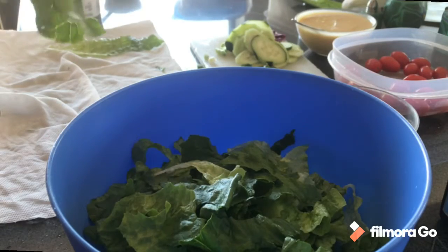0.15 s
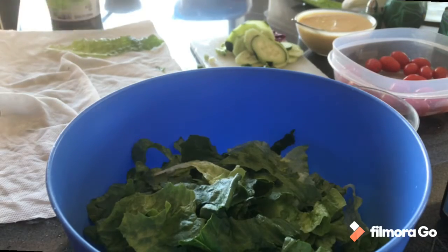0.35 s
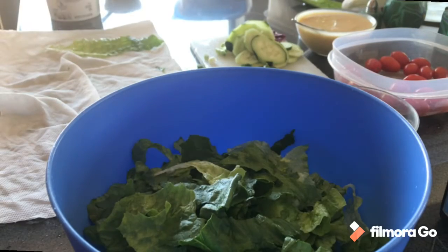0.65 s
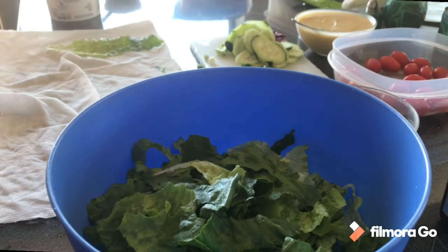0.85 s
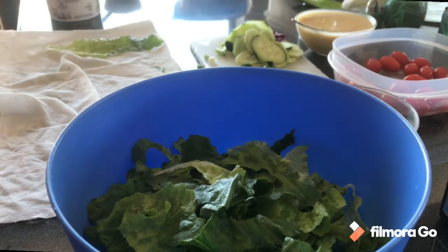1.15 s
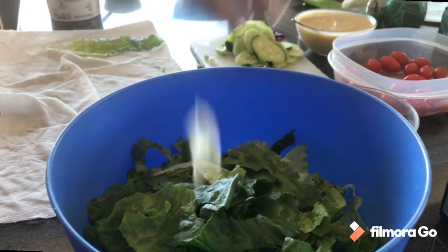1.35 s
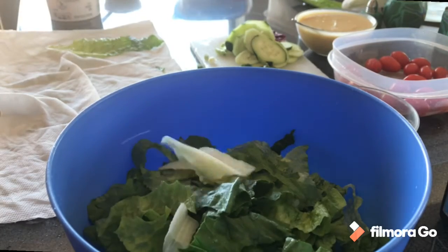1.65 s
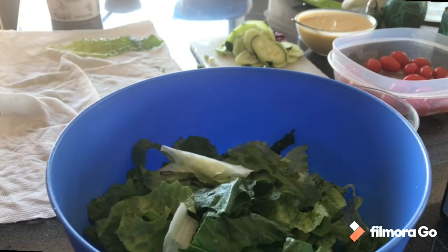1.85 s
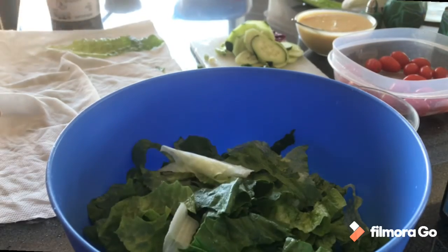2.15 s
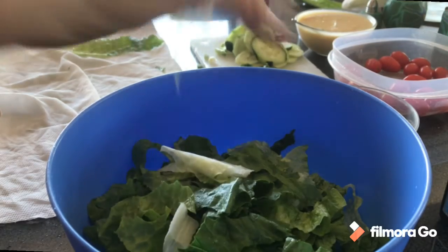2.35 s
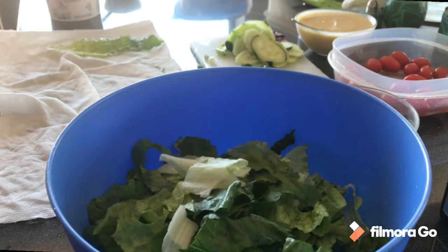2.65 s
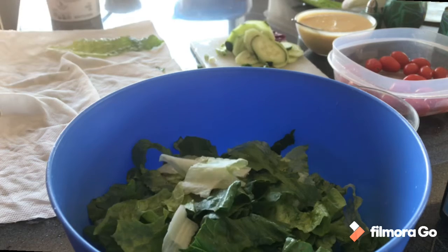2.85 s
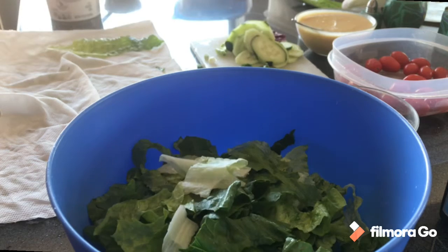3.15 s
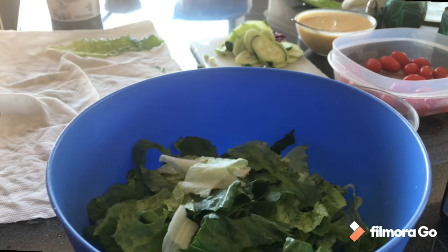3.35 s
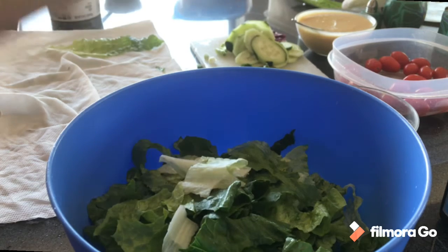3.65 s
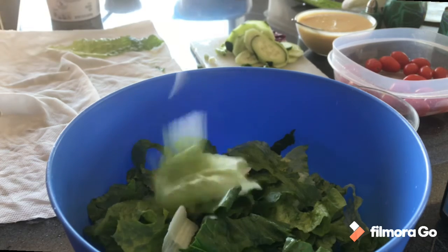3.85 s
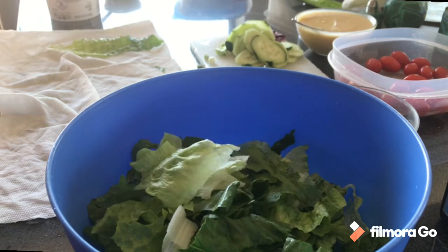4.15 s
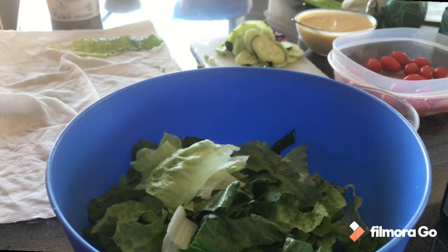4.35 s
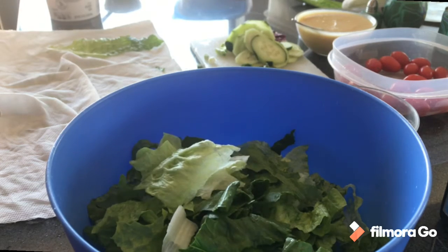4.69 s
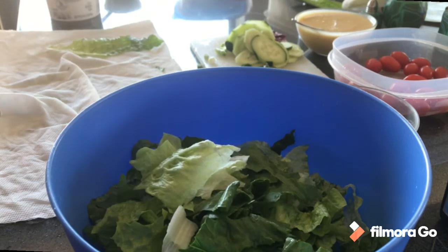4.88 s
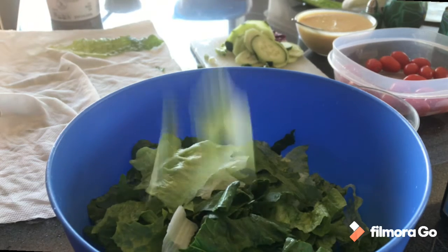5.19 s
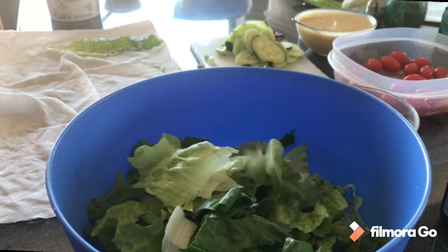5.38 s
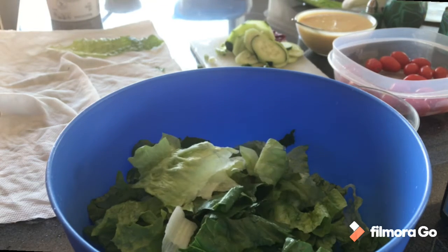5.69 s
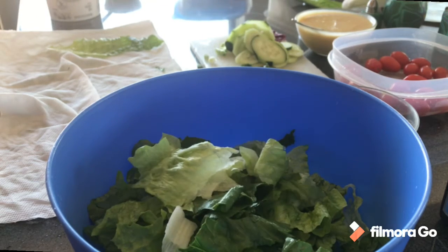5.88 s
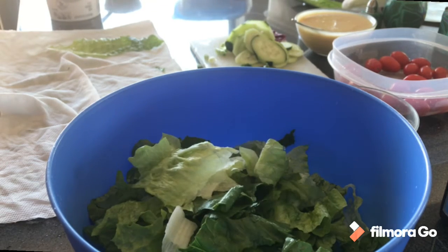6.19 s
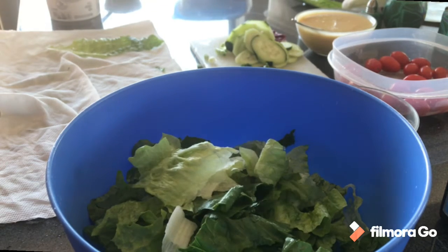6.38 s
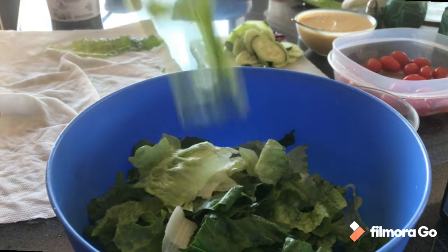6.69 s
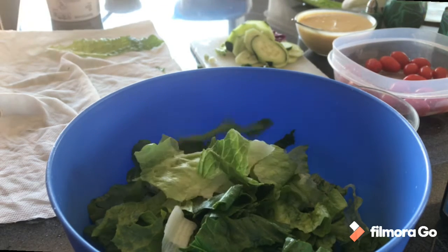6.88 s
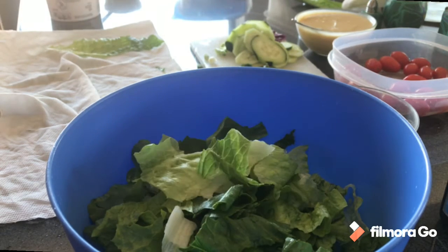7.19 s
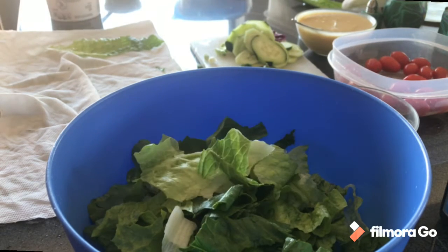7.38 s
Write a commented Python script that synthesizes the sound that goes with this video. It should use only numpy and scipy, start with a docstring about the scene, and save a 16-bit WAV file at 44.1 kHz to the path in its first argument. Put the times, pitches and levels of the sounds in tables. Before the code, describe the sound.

Short crackling rips of fresh lettuce leaves, ribs popping in uneven bursts, torn pieces landing softly on a heap of greens.

```python
"""Tearing crisp lettuce

Crisp lettuce is torn by hand over a plastic salad bowl in a quiet kitchen.
Ribs and veins snap as short runs of noise impulses, each ringing a flap of leaf.
Between the snaps the bent leaf crinkles: random tiny ticks that swell with every bend.
Torn pieces drop on the heap as soft noise bursts, the room answers with early echoes
and a short noise tail, and filtered noise and wavering sines make the air and appliance hum."""
import sys
import numpy as np
from scipy import signal
from scipy.fft import rfft, irfft
from scipy.io import wavfile
from scipy.ndimage import uniform_filter1d

SR = 44100
rng = np.random.default_rng(int(sys.argv[2]) if len(sys.argv) > 2 else 0)


def unload_audio(sound):
    """Save the sound as a 16-bit wav file, at the path given as the first command line argument."""
    columns = np.transpose(np.atleast_2d(sound))
    # keep every value between -1 and 1, then stretch to whole-number steps
    steps = np.round(np.clip(columns, -1, 1) * 32767)
    wavfile.write(sys.argv[1], SR, steps.astype(np.int16))


N = 332073  # length in samples

# spectrum of the room's air, shape only: f/Hz, level/dB
AIR_SPECTRUM = [(20, -35.5), (42, -11.5), (65, 2.5), (100, -6), (250, -3), (400, -11), (700, -19),
                (1100, -18.5), (2000, -27), (6000, -29), (10500, -37.5), (15500, -30)]
# appliance hum lines: f/Hz, rms level/dB
HUM_LINES = [(67.5, -69.5), (131.5, -66), (263.8, -70), (474, -74.5), (1007, -80.5)]
# the kitchen's decay time to -60 dB: f/Hz, t60/s
KITCHEN_DECAY = [(200, 0.44), (1000, 0.48), (3000, 0.5), (6000, 0.39), (10000, 0.35), (16000, 0.28)]
# one reflection off the counter: delay/s, gain
COUNTER_ECHO = (0.001213, 0.057)
# single reflections off the counter and the cupboards: delay/s, gain
CUPBOARD_ECHOES = [(.0062, 0.23), (.0095, 0.14), (0.0111, 0.079), (0.0136, 0.069)]
# pieces landing on the heap: t/s, energy level/dB, settling time/s, piece resonance f/Hz, its height/dB
LANDINGS = [(1.462, -25.5, 0.0036, 3000, -1), (1.498, -30.5, 0.0034, 3500, 6),
            (1.617, -21.5, 0.0044, 2000, -5), (2.5061, -10.5, 0.0041, 4960, 8),
            (3.938, -18, 0.016, 3000, 0), (3.998, -25.5, 0.0027, 5100, -5), (5.295, -21, 0.01, 3980, 2),
            (6.803, -15.5, 0.005, 5150, 3.5), (6.835, -19, 0.0087, 1974, -1)]
# spectrum of a landing, shape only: f/Hz, level/dB
HEAP_SPECTRUM = [(80, -9), (300, -7.5), (700, -3), (1400, -3), (2500, -4), (5200, -2.5), (9000, -6.5),
                 (15500, -15.5)]
# each bend of a leaf, in the fingers or as it settles in the bowl:
# start t/s, length/s, level/dB (before the crinkle's trim)
LEAF_BENDS = [(0.054, 0.063, -48), (0.129, 0.12, -59.5), (0.453, 0.086, -65), (0.746, 0.022, -60),
              (0.931, 0.18, -56), (1.469, 0.017, -60), (1.629, 0.035, -57.5), (1.739, 0.052, -61.5),
              (1.836, 0.12, -55.5), (2.023, .12, -52), (2.176, 0.048, -44.5), (2.385, 0.023, -56),
              (2.721, 0.033, -54), (2.771, 0.095, -64), (3.176, 0.14, -55), (3.376, 0.068, -51),
              (3.496, 0.044, -37), (3.575, 0.18, -60), (3.815, 0.048, -62.5), (4.234, 0.04, -49.5),
              (4.33, 0.16, -52.5), (4.529, 0.054, -61), (4.678, 0.086, -48), (4.824, .14, -46),
              (5.091, 0.039, -55.5), (5.34, 0.044, -66), (5.678, 0.16, -51), (5.92, .11, -52),
              (6.106, .145, -55.5), (6.281, 0.18, -45), (6.492, 0.073, -54), (6.621, 0.072, -53),
              (6.811, .035, -58), (6.946, .07, -62.5), (7.037, 0.042, -55), (7.173, 0.092, -56.5),
              (7.312, 0.062, -56), (7.443, 0.089, -46.5)]
# spectrum of the crinkle, shape only: f/Hz, level/dB
CRINKLE_SPECTRUM = [(200, -25), (700, 1), (1300, 3.5), (3000, 1.5), (6000, 2.5), (10000, -4), (15500, -4)]
# ribs and veins that stand out of the crinkle, tear by tear; thin veins pop as the leaf is folded:
# t/s, energy level/dB, crack length/ms, leaf resonance f/Hz, its height/dB, body/dB, crispness/dB
RIB_SNAPS = [ (0.0391, 1.5, 2.8, 8100, 2.5, 11, 3.5), (0.109, -15, 0.2, 9000, 1, -4, 6),
             (0.261, -12, 0.28, 2590, 2, 10, -2.5), (0.3682, -12, 0.15, 1710, 14.5, 18.5, 4),
             (0.5893, -33.5, 0.084, 6000, 0, 2, 12), (0.6406, -12.5, 0.077, 2090, 8, 8.5, 6.5),
             (0.7731, -26, 1, 2800, 10, 6, -3), (0.8184, -8.5, 0.2, 2000, 19, -3.5, 8.5),
             (0.8399, 0, 0.31, 3670, 9, 0.5, 5.5), (0.9188, -10, 0.4, 3640, 10, -2, 1),
             (0.9348, -5, 0.43, 2240, 4.5, -15, -0.5), (0.968, 3.5, 0.35, 3230, 13, 0.5, 1.5),
             (0.9737, -8.5, 0.9, 3090, -14, -7, 1), (1.1402, -15, 0.66, 2500, 2, -16, -2),
             (1.9116, -14, 2.8, 4530, 11, 3, 2), (1.977, -12, 1.7, 5140, 16, 17, 10),
             (2.0037, -11, 1.3, 1180, 13.5, 4, -2), (2.0274, -8, 0.68, 7150, 7, 9, 0),
             (2.043, -9.5, 0.25, 6080, 7, 11, -1), (2.1002, -4, 0.1, 1260, 11, -14, 3.5),
             (2.161, -15, 0.35, 3090, 5, -5, 0), (2.167, 5, 1.3, 1310, 4, 5.5, -3),
             (2.178, -13, 1.1, 1690, 8, 16, 5), (2.1956, -3, 2.4, 4570, 3, -4, 0),
             (2.2455, -5.5, 0.92, 2500, 13, -1, 6), (2.381, -28, 0.2, 3670, 18, 3, 15),
             (2.785, -24.5, 0.23, 4740, 17, 26, 24), (2.824, -25, 0.2, 4740, 8, 1.5, 11),
             (3.068, -26, 7, 8000, -2, 1, 9), (3.172, -21, 0.18, 6700, 7, -1, 6),
             (3.199, -11.5, 0.1, 2320, 6, 6, 7), (3.2745, -19.5, 0.15, 4200, 14, 3, -1),
             (3.4116, -6, 0.35, 1990, 10, -4, 1), (3.4359, -7.5, 4.3, 5000, 5, 15, 4),
             (3.4618, 4, 1.3, 4630, 11, 4, 6.5), (3.466, -3.5, 0.58, 1740, 5, 18, -11),
             (3.4824, -6.5, 0.22, 1130, 24, -18, -13), (3.5113, -3, 1.1, 4150, 11, 14, 10),
             (3.5221, -5.5, 2, 4190, 7, 16.5, 5), (3.53, -7.5, 0.91, 1250, 20, -9, -2),
             (3.604, -15, 0.25, 9000, 5, 14, 9), (3.6162, -16, 0.98, 1290, 17, -9, -4),
             (4.1668, -31, 1.7, 4000, 8, 6, -5), (4.2084, -23, 0.37, 3690, 15, 19, 17),
             (4.254, -13, 2.5, 5500, 9, 2, 4), (4.2718, -18.5, 1.2, 2980, 7, 21, 5),
             (4.3135, -8, 0.44, 1040, 8, -3.5, 0), (4.3669, -12, 0.33, 5510, 10, 3, 11),
             (4.42, -20, 1.9, 3320, 5, 14, 6), (4.45, -16, 5, 3600, 7, 17, 13),
             (4.7115, -9.5, 0.72, 7530, 5.5, 11.5, -2), (4.811, -13, 4.5, 3440, 2, -1, 3),
             (4.8172, -4.5, 1, 2520, 3, 4, -3), (4.822, -2.5, 1.1, 2410, 4, 7, 2),
             (4.8267, -7, 0.79, 1310, -1, 16.5, -2), (4.8402, -5, 0.43, 1460, 15, -10, -8),
             (4.8659, -3.5, 2.3, 2830, 11.5, 0, 3.5), (4.9153, -14, 0.63, 2700, 25, 0, 11),
             (4.9284, -11.5, 1.8, 2880, -4, -11, 6), (4.9454, -8, 0.9, 2880, 3.5, 4, 4.5),
             (4.9533, -15, 0.2, 3780, 20, 9, 9), (5.1248, -20, 2.7, 7200, 3, -4, 12),
             (5.5448, -26, 0.14, 5500, 7, 9, 2), (5.5931, -15, 0.23, 8200, 11.5, 14.5, -2.5),
             (5.704, -11.5, 0.14, 8090, 11.5, -1, 0.5), (5.7769, -9.5, 0.22, 6200, 9, 0, 11),
             (6.0114, -18.5, 1.7, 4260, 5, 17, 9), (6.247, -22.5, 0.23, 6770, 2, 2, -2),
             (6.2666, -1, 0.2, 1710, 6.5, -3.5, 0.5), (6.3202, -6, 0.2, 1350, 19, -4, 0),
             (6.358, -9, 2.3, 1530, 15, 6, 0), (6.3749, -2.5, 0.81, 5950, 8.5, 17, 8),
             (6.392, -8.5, 1.8, 2980, 3, -8, 7), (6.434, -9.5, 0.18, 8090, 10, 12, 11),
             (6.4896, -14.5, 0.23, 1600, 12, -1, 8.5), (6.5287, -12.5, 0.18, 5300, 10, 16, 19),
             (6.61, -26.5, 0.17, 2240, -2, -11, 6), (6.625, -23.5, 2.6, 4940, 6, 1, 15),
             (7.1984, -15.5, 0.17, 1290, 22, -21, -15), (7.2107, -14.5, 0.56, 2800, 10, 8, 10.5),
             (7.472, -15.5, 9.5, 5660, 10, 14, 7), (7.5048, -4, 0.16, 2880, 2.5, -3, -0.5),
             (7.5245, -8.5, 2.1, 4060, 3, 5.5, 3)]
# spectrum of a snap, shape only: f/Hz, level/dB
LEAF_SPECTRUM = [(100, -24), (250, -24), (370, -16), (520, -28.5), (800, -23.5), (1150, -8), (1480, -9),
                 (1900, -6.5), (3000, -1), (5200, 0), (7200, -3), (10500, -9.5), (15500, -13)]

HOLD_DB = -72.5  # a leaf that is only held, on the same scale as the bends
BEND_ATTACK_S, BEND_RELEASE_S = 0.024, 0.019
VEINS_DB, VEIN_SCATTER_DB = -5, 2.5  # small veins' rms level re the bend's, and scatter between veins
LEAD = 128  # samples of lead-in before the main break
GRAIN = 1024  # samples in a crack or an impulse response


def amp(db):
    """Turns dB into an amplitude factor."""
    return 10 ** (np.asarray(db) / 20)


def evened(x):
    """Scales to rms 1."""
    return x / np.sqrt(np.mean(x ** 2) + 1e-20)


def unit(x):
    """Scales to energy 1."""
    return x / np.sqrt(np.sum(x ** 2) + 1e-20)


def read(points, hz):
    """Reads a curve on a log-frequency axis."""
    f, value = np.transpose(points)
    return np.interp(np.log(hz + 1), np.log(f + 1), value)


def add(mix, s, sound):
    """Mixes a sound in at time s."""
    part = mix[max(round(s * SR), 0):][:len(sound)]
    part += sound[:len(part)]


def bins(size):
    """Frequencies in Hz of a real spectrum."""
    return np.fft.rfftfreq(size, 1 / SR)


def ring(db):
    """Builds the minimum-phase impulse response with this dB spectrum: energy comes as early as it can."""
    log_gain = np.log(amp(np.r_[db, db[-2:0:-1]]))
    return np.fft.ifft(np.exp(np.conj(signal.hilbert(log_gain)))).real


def drift(hz):
    """Makes slow random motion of rms 1, up to about hz."""
    spectrum = rfft(rng.standard_normal(N)) / (1 + (bins(N) / hz) ** 4)
    return evened(irfft(spectrum, N))


def background(air_db=-58.5, waver=0.28, waver_hz=31, wander_hz=1.467, wander_rate_hz=4.2):
    """Rumble and hiss of the room, with appliance lines that waver in level and wander in pitch."""
    air_spectrum = rfft(rng.standard_normal(N)) * amp(read(AIR_SPECTRUM, bins(N)))
    out = amp(air_db) * evened(irfft(air_spectrum, N))
    for hz, db in HUM_LINES:
        turns = np.cumsum(hz + wander_hz * drift(wander_rate_hz)) / SR
        line = (1 + waver * drift(waver_hz)) * np.sin(2 * np.pi * turns)
        out += amp(db) * evened(line)
    return out


def kitchen(x, wet_db=-10.5, first_s=0.0017, build_s=0.0035, count=4):
    """A dense noise tail whose treble dies first; random tails trade places at fixed rates to keep it smooth."""
    t, out = np.arange(SR * 3 // 4) / SR, np.zeros(N)
    for k in range(count):
        hz, at, z = signal.stft(rng.standard_normal(len(t)), SR, nperseg=256)
        decay = 1e-3 ** (at / read(KITCHEN_DECAY, hz)[:, None])
        tail = signal.istft(z * decay, SR, nperseg=256)[1][:len(t)]
        build = 1 - np.exp(-np.maximum(t - first_s, 0) / build_s)
        # one quadrature pair of tails turns at 3 Hz, the other at 7 Hz
        turn_hz = 3 + 4 * (k // 2)
        turn = 2 * np.pi * turn_hz * np.arange(N) / SR + k * np.pi / 2
        feed = x * np.cos(turn) * np.sqrt(2 / count)
        out += signal.oaconvolve(feed, unit(tail * build))[:N]
    return amp(wet_db) * out


def cupboards(x):
    """The first single reflections: plain delayed, quieter copies."""
    out = np.zeros(N)
    for s, gain in CUPBOARD_ECHOES:
        add(out, s, gain * x)
    return out


def flap(hz, centre_hz, width_octaves=0.28):
    """The resonance peak (0-1) of a loose flap of leaf, bell-shaped over octaves."""
    return np.exp(-.5 * (np.log2((hz + 1) / centre_hz) / width_octaves) ** 2)


def drops(rustle=0.17, rustle_s=0.012, rise_s=0.00033):
    """A piece slaps the heap softly, then slides to rest: decaying noise coloured by heap and piece."""
    out, t, hz = np.zeros(N), np.arange(SR // 6) / SR, bins(GRAIN)
    for s, db, settle_s, flap_hz, flap_db in LANDINGS:
        slap = np.exp(-t / max(settle_s, 1e-3))
        slide = rustle * np.exp(-t / rustle_s)
        contact = (1 - np.exp(-t / rise_s)) * (slap + slide)
        touches = rng.standard_normal(len(t)) * contact
        colour = ring(read(HEAP_SPECTRUM, hz) + flap_db * flap(hz, flap_hz))
        add(out, s, amp(db) * unit(signal.fftconvolve(touches, colour)))
    return out


def crack(length_ms, cells_per_s=9000, cell_size=0.37, scatter=0.35, scatter_s=0.0018, lead_in=0.042,
          lead_in_s=0.00089):
    """A faint noise lead-in, the break, then a run of cells bursting; counter and bowl scatter the sound."""
    t = (np.arange(GRAIN) - LEAD) / SR
    size, chance, spray = rng.standard_normal(len(t)), rng.random(len(t)), rng.standard_normal(len(t))
    bursts = cell_size * (chance < cells_per_s / SR) * np.exp(-abs(t) / (max(length_ms, .05) * 1e-3))
    swell = lead_in * np.exp(-abs(t) / lead_in_s)
    cells = size * np.where(t < 0, swell, bursts)
    cells[LEAD] = 1  # the break itself
    near = scatter * spray * np.exp(-(t - t[0]) / scatter_s)
    near[0] = 1  # the direct sound
    delay_s, gain = COUNTER_ECHO
    add(near, delay_s, np.array([gain]))
    # each crack keeps its own fine ripple, while its broad colour comes from the leaf
    z = rfft(signal.fftconvolve(cells, near)[:len(t)])
    broad = np.sqrt(uniform_filter1d(abs(z) ** 2, size=27) + 1e-9)
    return unit(irfft(z / broad))


def bending():
    """The crinkle's amplitude over time: a bend swells in, keeps an even pressure and lets go."""
    t, power = np.arange(N) / SR, amp(HOLD_DB) ** 2
    for start, length, db in LEAF_BENDS:
        before, after = np.maximum(start - t, 0), np.maximum(t - start - length, 0)
        swell = np.exp(-before / BEND_ATTACK_S - after / BEND_RELEASE_S)
        power = power + (amp(db) * swell) ** 2
    return np.sqrt(power)


def crinkle(ticks_per_s=700, spread_db=5.5, trim_db=-3.0, flap_db=9, clump_db=1.0, clump_hz=31, spots=16):
    """Tiny cracks come in clumps all over the bent leaf, each spot with its own resonance."""
    hz, out = bins(GRAIN), np.zeros(N)
    for flap_hz in np.geomspace(1500, 10000, spots):
        colour = ring(read(CRINKLE_SPECTRUM, hz) + flap_db * flap(hz, flap_hz))
        tick = unit(signal.fftconvolve(crack(length_ms=0.51), colour))
        at = np.flatnonzero(rng.random(N) < ticks_per_s / spots / SR)
        sizes = amp(spread_db * np.minimum(rng.exponential(1, len(at)), 4))
        for s, size in zip(at / SR, sizes):
            add(out, s, size * tick)
    clumped = evened(out * amp(clump_db * drift(clump_hz)))
    return amp(trim_db) * bending() * clumped


def veins(shortest_ms=0.31, longest_ms=3.8, low_hz=1900, high_hz=6000, flap_db=7, body_db=8, crisp_db=4,
          count=4):
    """A few small veins break at uneven intervals in each bend and share its energy; rows as in RIB_SNAPS."""
    rows = []
    for start, length, db in LEAF_BENDS:
        when, long, pitch = rng.random((3, count))
        times = start + length * (np.arange(count) + when) / count
        share_db = 10 * np.log10(length * SR / count)  # from rms level to energy per vein
        levels = db + VEINS_DB + share_db + VEIN_SCATTER_DB * rng.standard_normal(count)
        lengths = shortest_ms * (longest_ms / shortest_ms) ** long
        flaps = low_hz * (high_hz / low_hz) ** pitch
        rows += [(*vein, flap_db, body_db, crisp_db) for vein in zip(times, levels, lengths, flaps)]
    return rows


def snaps(ripple_share=0.57):
    """Each crack rings the flap of leaf beside it: body lifts the lows, crispness the highs.
    Returns what reaches the listener straight and what spreads into the room."""
    hz, straight, spread = bins(GRAIN), np.zeros(N), np.zeros(N)
    low, high = read([(1000, 1), (4000, 0)], hz), read([(4000, 0), (12000, 1)], hz)
    for s, db, length_ms, flap_hz, flap_db, body_db, crisp_db in RIB_SNAPS + veins():
        colour_db = read(LEAF_SPECTRUM, hz) + flap_db * flap(hz, flap_hz)
        colour_db = colour_db + body_db * low + crisp_db * high
        burst = crack(length_ms)
        direct = unit(signal.fftconvolve(burst, ring(colour_db)))
        add(straight, s - LEAD / SR, amp(db) * direct)
        # summed over all directions, the crack's ripple is milder
        ripple_db = ripple_share * 20 * np.log10(abs(rfft(burst)) + 0.00088)
        add(spread, s, amp(db) * unit(ring(colour_db + ripple_db)))
    return straight, spread


def scene(heap_room_db=-5):
    """The lettuce, its echo in the kitchen and the room's own sound."""
    (straight, spread), crinkling, landings = snaps(), crinkle(), drops()
    near = straight + crinkling
    # the bowl's wall holds back part of a landing from the room
    room = kitchen(spread + crinkling + amp(heap_room_db) * landings)
    return (near + landings + cupboards(near) + room + background())[None]


def record(dry, edge_hz=15950):
    """Cuts the top of the band steeply with a linear-phase low-pass."""
    lowpass = signal.firwin(511, edge_hz, window=("kaiser", 9), fs=SR)
    return signal.oaconvolve(dry, lowpass[None], "same")


dry = scene()
out = record(dry)
unload_audio(out)
```